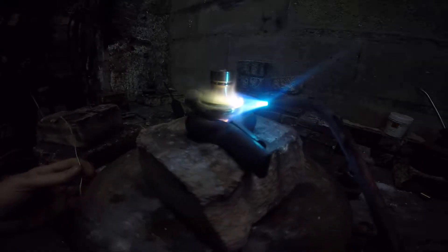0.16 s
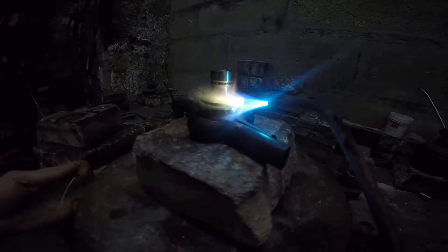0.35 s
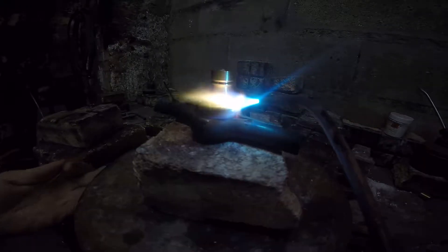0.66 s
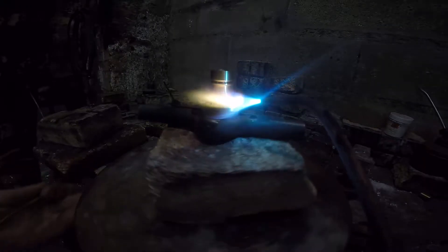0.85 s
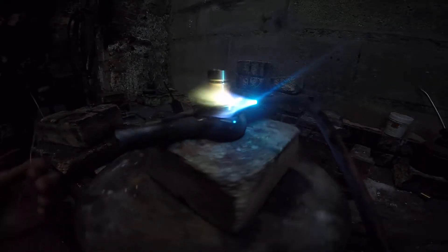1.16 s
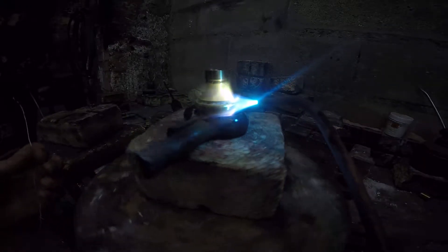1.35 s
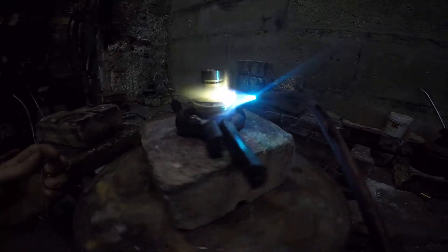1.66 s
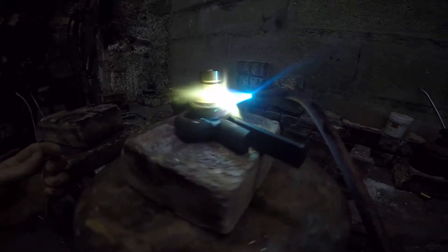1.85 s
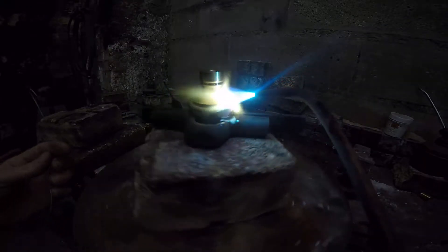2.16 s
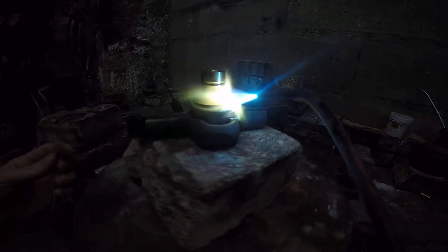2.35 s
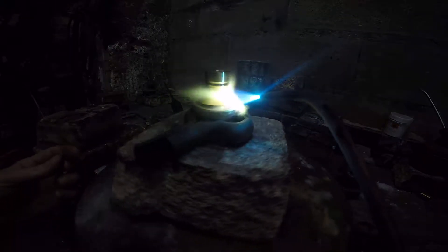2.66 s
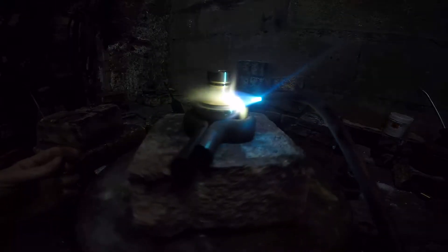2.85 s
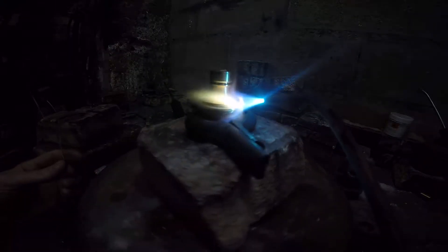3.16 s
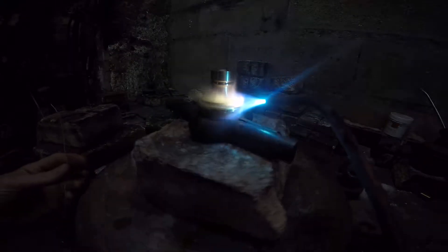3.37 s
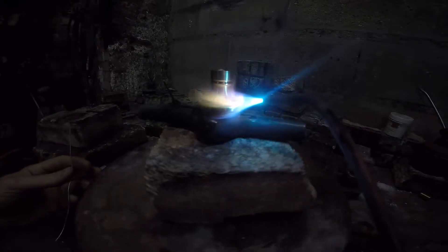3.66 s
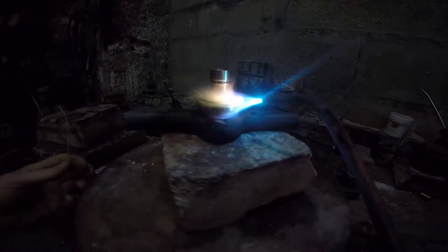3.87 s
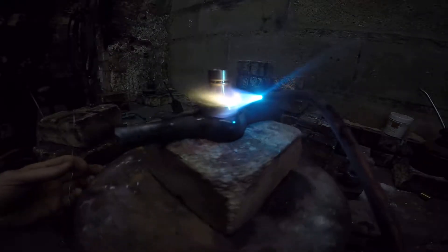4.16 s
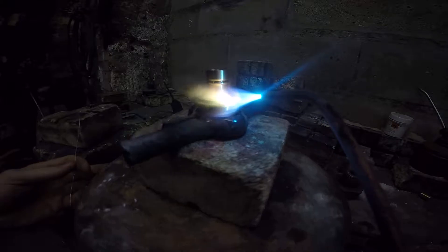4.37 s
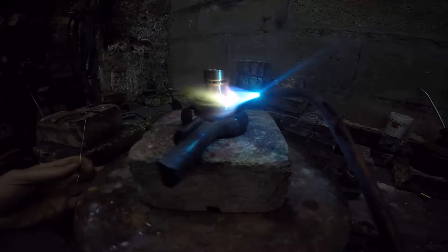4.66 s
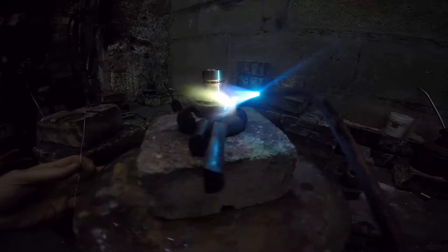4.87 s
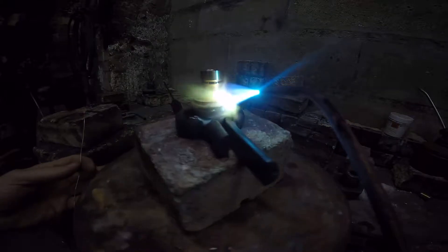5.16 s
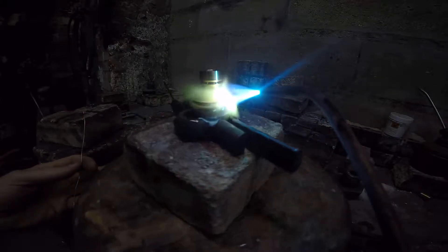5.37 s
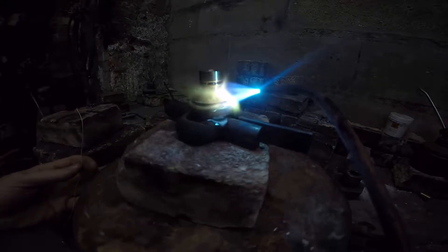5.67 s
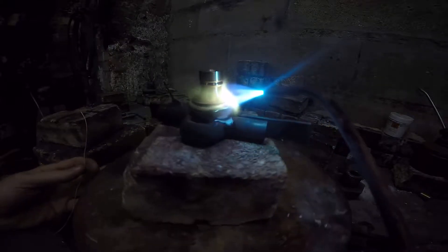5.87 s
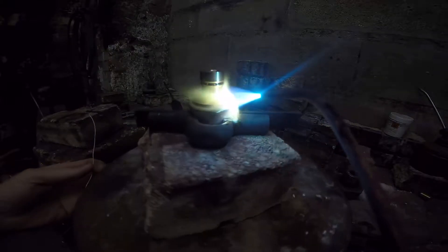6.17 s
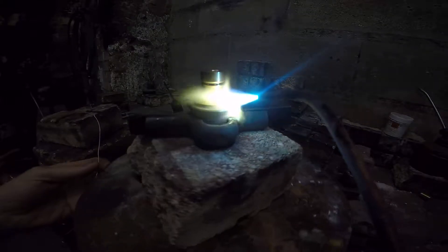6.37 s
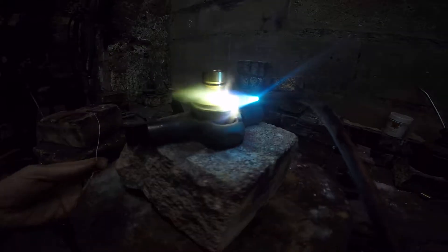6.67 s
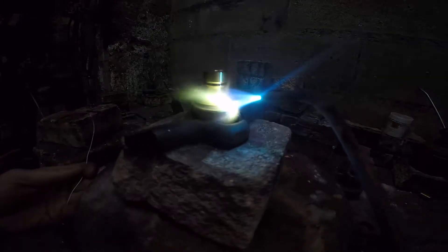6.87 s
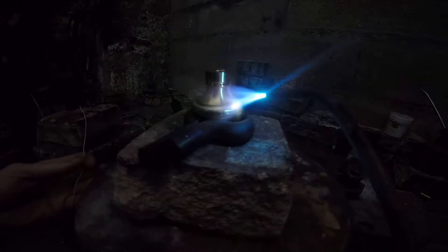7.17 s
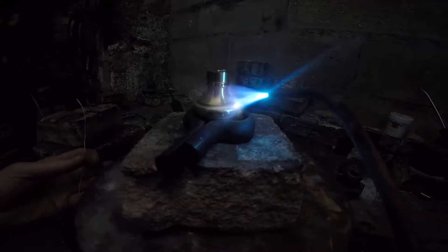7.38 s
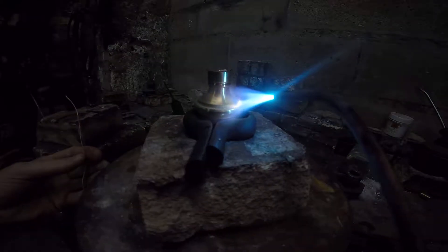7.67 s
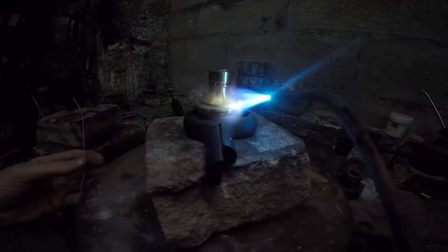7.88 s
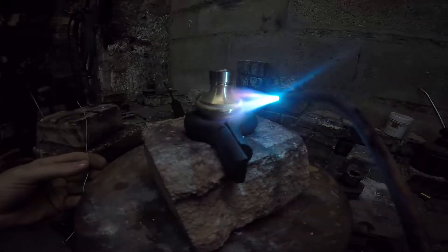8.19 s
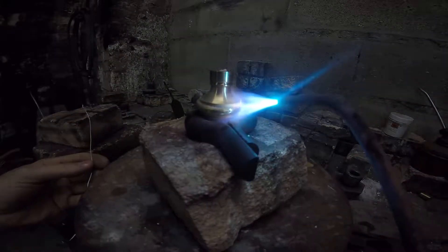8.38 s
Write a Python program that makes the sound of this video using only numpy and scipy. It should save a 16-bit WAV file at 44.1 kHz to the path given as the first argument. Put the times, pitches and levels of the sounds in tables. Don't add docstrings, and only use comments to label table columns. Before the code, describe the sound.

From 0 to 8.5 seconds a gas torch hisses continuously, close and dense, with its energy mainly in the mids and upper mids and a thinner airy top. The jet flutters finely, and its brightness shifts softly every 0.7 to 1 second as faces of the turning metal part splash the flame. At about 0.8 s a heavy, very deep thud rings the small stone room, leaving low rumble that lingers to about 2 s and then subsides unevenly. Between 5 and 6.5 s the flame wraps the part, thickening the low growl slightly. A weaker dull thud comes at 6.8 s; by 7.8 s the torch is drawn back and the tone is fuller in the body, with a little less hiss. Faint motor hum and distant traffic stay underneath. Nearly mono, boxy and notched from the camera housing, with short wall reflections.

```python
import sys
import numpy as np
from scipy import signal
from scipy.fft import rfft, irfft, next_fast_len
from scipy.io import wavfile
from scipy.ndimage import uniform_filter1d, map_coordinates

SR = 44100
rng = np.random.default_rng(int(sys.argv[2]) if len(sys.argv) > 2 else 0)


def master(y):
    cut = np.clip(np.atleast_2d(y).T, -1, 1)
    pcm = np.round(cut * 32767)
    wavfile.write(sys.argv[1], SR, pcm.astype(np.int16))


def nominal_scale(level):
    x = np.asarray(level, float) / 20
    return 10 ** x


N = 376173
STFT_SIZE = 512

# frequency in [Hz], density in [dB per Hz].
JET_DB = [(60, -120), (98, -27), (400, -21), (800, -13.5), (1300, -12.5), (1750, -3.5), (2700, -4),
          (3500, -5), (5000, -6), (7500, -19.5), (9000, -26.5), (10400, -20), (12000, -24.5),
          (15400, -25.5)]
# time in [s], strength in [dB].
FLOW_DB = [(0.0, -24.5), (0.02, -26.5), (0.71, -25), (0.92, -24), (1.21, -26), (1.49, -24.5), (1.83, -27),
           (2.21, -26), (3.26, -26.5), (3.59, -23.5), (4.11, -25.5), (4.44, -25), (5.08, -26.5),
           (6.08, -25), (6.49, -25.5), (8.48, -26.5), (8.53, -25.5)]
# time in [s], drawn back [0-1], flame wraps the part [0-1].
HAND = [
    (0, 0.73, .1),
    (1.2, 0.13, 0),
    (2.2, .05, 0.37),
    (3.9, 0.42, 0.1),
    (5, 0, 0.64),
    (5.9, 0.23, 0.94),
    (6.6, 0.4, 0.67),
    (7.8, 1, 1),
    (8.53, 1, 0.7),
]
# time in [s], half length in [s], level in [dB].
FACES = [(.8, 0.18, 4), (1.552, 0.19, 3.5), (2.12, .13, 3.5), (2.85, 0.36, 3.5), (3.62, 0.17, 4),
         (4.78, 0.2, 2.5), (5.8, .3, 2), (6.549, 0.24, 2.5), (7.6, .2, 2.5)]
# level in [dB], share of flow [dB/dB], share of splash [dB/dB],
# change drawn back in [dB], change wrapped in [dB].
BANDS = [
    (-56.5, .1, -0.18, 0.5, 4.5),
    (-44.5, 0.17, -0.0055, -.3, -1),
    (-41.5, 0.15, 0.017, 5, -.5),
    (-33.5, 0.77, -0.31, -0.8, 1.5),
    (-28, 1.33, -0.063, 0.85, 0.15),
    (-33, .8, 0.36, -.3, 0.35),
    (-39, .3, 1.22, -1.5, -0.45),
    (-45.5, .05, 0.42, 0, -1.2),
    (-43.5, .05, -0.0028, 2.2, 1),
]
SEAMS_HZ = [450, 1350, 2100, 2820, 4250, 6300, 8600, 11800]
# time in [s], centre # in [Hz], half length in [s], level in [dB].
GLINT = [(.1, 12400, .3, 10), (.35, 14130, .5, 6), (.1, 12000, .5, -5), (1.2, 13000, .45, -5),
         (.93, 15160, .17, 5), (1.15, 8700, .35, -3), (1.66, 14500, .13, 10), (2.2, 10500, .5, 2.5),
         (2.17, 15160, .17, 7), (3.3, 12300, .2, 5), (3.35, 14040, .25, 5), (.85, 11900, .3, 4),
         (4.15, 10200, 0.26, -2.5), (7.5, 12150, .35, 2), (3.55, 11000, .3, -2), (4.99, 12000, .5, 2.5),
         (5.06, 12000, .3, 5), (5.55, 13500, .3, 7), (5.5, 14600, .25, 4), (5.91, 9600, 0.2, 5),
         (6.15, 15160, .17, 5), (6.18, 12000, .17, 7), (8.33, 11650, 0.19, 4), (6.6, 12500, .3, -5),
         (7.18, 13950, .5, -5), (7.2, 8700, 0.49, 6), (7.51, 13500, .27, 3), (8.1, 10200, 0.39, -10),
         (8.36, 15500, .17, 6),
         (1.6, 2450, .12, -1.5), (2.2, 1700, .1, -2.5), (2.3, 4200, 0.16, -2.5), (3.248, 1750, .15, 4.5),
         (3.42, 2600, .12, -2.5), (4.596, 2400, 0.098, -1), (4.6, 5400, .2, -2), (5.2, 1750, .12, 2),
         (5.3, 5100, .3, 2), (6.15, 4200, .2, -3), (6.7, 2450, .35, 1)]
GLINT_WIDTH_HZ = 460
# time in [s], half length in [s], level in [dB].
SHADE = [(0.312, .3, -1), (1, .12, -2), (1.86, .06, -3), (2.3, .08, -2), (2.72, .15, 2.5), (3.83, .12, -4),
         (5.2, .1, -4), (6.22, .1, -4), (6.68, .15, 2.5), (7.98, 0.18, -3)]
SHADE_HZ, SHADE_WIDTH_HZ = 13500, 1400
# frequency in [Hz], share [0-1].
SCATTER = [(300, 0.018), (2000, 0.047), (6000, 0.09), (10000, 0.62), (15000, 0.34)]
# delay in [s], drift in [knots per s].
ECHO_PATHS = [(.0007, 0.487), (.0013, 0.69), (.0022, 1.1), (.0036, 1.8)]
# frequency in [Hz], depth in [dB].
PATCHY_DB = [(4000, .1), (8000, .8), (13000, 2)]
# frequency in [Hz], depth in [dB].
FLUTTER_DB = [(1000, 1), (3500, .5), (6000, 0.9), (9000, 0.9), (14000, 1)]
# centre in [Hz], width in [Hz], gain in [dB].
HOUSING = [(231, 20, -6), (517, 175, -5), (763, 38, -5), (800, 52, 2), (978, 80, -8), (1008, 8, 6),
           (1167, 12, -5), (1325, 625, -16), (1565, 38, -7), (2060, 625, -14.5), (2370, 115, -10.5),
           (2728, 85, 10.5), (2820, 250, -13), (3130, 174, -8), (3345, 160, 7), (3850, 50, 2.5),
           (3520, 30, -3), (3870, 300, 8.5), (4250, 807, -20.5), (5200, 121, -5.5), (5310, 202, -5.5),
           (5580, 243, 4), (6270, 625, -7.5), (6430, 162, 9.5), (6670, 347, -8.5), (7210, 59, -5.5),
           (7620, 384, 9), (9540, 587, -12), (10900, 610, -8.5), (13100, 200, 3)]
# start in [s], level in [dB], hold in [s].
ROOM = [
    [(-.1, -44, 0.91), (.77, -30.5, 0.46), (1.55, -37.5, 0.31), (2.05, -42.5, .3), (3.2, -42.5, 0.75),
     (4.5, -45.5, 0.9), (5.72, -46.5, 0.43), (6.58, -47.5, 1.1)],
    [(-.1, -51, .7), (.9, -43, 0.58), (2.65, -42, 0.93), (4.2, -48, .3), (4.72, -40, 0.3),
     (5.55, -47.5, .45), (6.8, -42, .08), (7.0, -45.5, 0.46), (7.75, -49, .5)],
    [(.77, -37, .1), (1.1, -39, .1), (1.55, -38.5, 0.089), (1.95, -46, .3), (2.8, -42.5, .35),
     (3.3, -51, .3), (6.8, -45, .06), (7.8, -50, .25)],
    [(.77, -36, 0.09), (1.27, -39, 0.11), (1.75, -45, 0.35), (2.6, -48, .55), (3.4, -52, 0.8)],
]
ROOM_HZ = [37.5, 45.6, 60, 69.7]
FALL_DB_PER_S = [35, 55, 60, 65]
RISE_S, QUIET_DB = 0.048, -59
# time in [s], peak in [dB], frequency in [Hz], t60 in [s].
THUDS = [
    (0.77, -8.5, 60, 0.14),
    (6.804, -22, 50, 0.19),
]
# frequency in [Hz], level in [dB rms].
HUM = [(92, -55.5), (73.8, -60.5), (111, -79)]
# frequency in [Hz], density in [dB per Hz].
TRAFFIC_DB = [(8, -120), (16, -17), (28, -1), (40, -2), (70, 2), (92, -2), (102, -16), (150, -120)]
# time in [s], centre in [Hz], width in [Hz], level in [dB].
STRAYS = [(1.8, 14500, 1700, -60), (2.36, 4700, 1200, -41), (2.36, 11100, 1600, -51),
          (4.75, 4800, 1200, -40), (4.75, 8200, 1700, -48), (4.75, 13900, 1700, -56),
          (6.285, 5900, 1500, -37), (6.285, 8900, 3000, -48)]
TOP_HZ = 15310


def torch():
    jet = walls(filtered(rng.standard_normal(N), housing), t60_s=.14, db=-24)
    hz, t, z = signal.stft(jet, SR, nperseg=STFT_SIZE, noverlap=STFT_SIZE * 3 // 4)
    moving = echoes(hz, t)
    band = np.searchsorted(SEAMS_HZ, hz)
    shape = housing(hz)[:, None] * moving
    power = np.array([np.sum(shape[band == k] ** 2, axis=0) for k in range(len(SEAMS_HZ) + 1)])
    band_gain = nominal_scale(band_db(t)) * np.sqrt(len(hz) / power)
    gain = uniform_filter1d(band_gain[band], size=3, axis=0)
    gain = gain * nominal_scale(glints_db(hz, t)) * flicker(hz, t)
    return signal.istft(z * moving * gain, SR, nperseg=STFT_SIZE, noverlap=STFT_SIZE * 3 // 4)[1][:N]


def band_db(t):
    flow_db, = curves(FLOW_DB, t)
    back, wrap = curves(HAND, t)
    splash_db = sum(db * bump(t, s, half_s) for s, half_s, db in FACES)
    return np.array(BANDS) @ [np.ones_like(t), flow_db - flow_db.mean(), splash_db, back, wrap]


def glints_db(hz, t):
    db_map = np.outer(bump(hz, SHADE_HZ, SHADE_WIDTH_HZ), sum(db * bump(t, s, half_s) for s, half_s, db in SHADE))
    for s, centre_hz, half_s, db in GLINT:
        db_map += db * np.outer(bump(hz, centre_hz, GLINT_WIDTH_HZ), bump(t, s, half_s))
    return db_map


def flicker(hz, t):
    chance = rng.standard_normal((24, 600))
    patches = map_coordinates(chance[:, 500:], np.meshgrid(hz / 1000, t * 7, indexing="ij"))
    eddies = map_coordinates(chance, np.meshgrid(hz / 1200, t * 55, indexing="ij"))
    flutter = 0.26 * wobble(45, t) + 0.27 * wobble(115, t) + 0.52 * eddies
    return nominal_scale(along(PATCHY_DB, hz)[:, None] * patches + along(FLUTTER_DB, hz)[:, None] * flutter)


def echoes(hz, t):
    turns = [np.outer(hz, delay_s + .00012 * wobble(rate, t)) for delay_s, rate in ECHO_PATHS]
    comb = sum(np.exp(-2j * np.pi * u) for u in turns) / 2
    return np.abs(1 + along(SCATTER, hz)[:, None] * comb)


def housing(hz):
    gain = 1
    for centre_hz, width_hz, db in HOUSING:
        off, damp = centre_hz ** 2 - hz ** 2, 1j * hz * width_hz
        gain = gain * np.abs((off + damp * nominal_scale(db)) / (off + damp))
    leak = np.interp(hz, [4500, 6000], [.08, .35])
    return nominal_scale(along(JET_DB, hz)) * np.hypot(gain, leak)


def walls(x, t60_s, db):
    t = np.arange(SR // 4) / SR
    tail = rng.standard_normal(len(t)) * nominal_scale(-60 * t / t60_s) * (t > .004)
    tail = np.convolve(tail, np.hanning(17))
    answer = signal.fftconvolve(x, tail / np.linalg.norm(tail))[:N]
    return (x + nominal_scale(db) * answer) / np.sqrt(1 + nominal_scale(db))


def sputter(x, db, edge_hz):
    t = np.arange(N) / SR
    knots = rng.exponential(size=8000) - 1
    bursts = np.interp(t * 500, np.arange(len(knots)), knots)
    treble = filtered(x, lambda hz: 1 / (1 + (edge_hz / (hz + 1)) ** 4))
    gain = nominal_scale(db * bursts)
    return x + treble * (gain / np.sqrt(np.mean(gain ** 2)) - 1)


def rumble():
    t = np.arange(N) / SR
    levels_db = [swells(rows, fall, t) for rows, fall in zip(ROOM, FALL_DB_PER_S)]
    low = np.zeros(N)
    for hz, db in zip(ROOM_HZ, levels_db):
        low += nominal_scale(db + 1.2 * wobble(5, t)) * tone(hz, .91, t)
    for hz, db in HUM:
        low += nominal_scale(db + 1.5 * wobble(4.5, t)) * tone(hz, .38, t)
    low += nominal_scale(levels_db[3] - 23) * tone(116.5, .4, t)
    wash = filtered(rng.standard_normal(N), lambda hz: nominal_scale(along(TRAFFIC_DB, hz)))
    loudness = np.sqrt(np.sum(nominal_scale(levels_db) ** 2, axis=0))
    low += wash / wash.std() * (nominal_scale(-16) * loudness + nominal_scale(-65))
    for s, db, hz, t60_s in THUDS:
        u = np.clip(t - s, 0, None)
        onset = 1 - np.exp(-(u / 0.017) ** 2)
        low -= nominal_scale(db - 60 * u / t60_s) * onset * np.sin(2 * np.pi * hz * u)
    return low


def swells(rows, fall_db_per_s, t):
    step = t[::STFT_SIZE // 2]
    power = nominal_scale(2 * QUIET_DB)
    for s, db, hold_s in rows:
        u = np.clip(step - s, 0, None)
        fall_db = fall_db_per_s * np.clip(u - hold_s, 0, None)
        power = power + (nominal_scale(db - fall_db) * (1 - bump(u, 0, RISE_S))) ** 2
    return np.interp(t, step, 10 * np.log10(power))


def tone(hz, drift_rad, t):
    return np.sqrt(2) * np.sin(2 * np.pi * hz * t + drift_rad * wobble(2.7, t))


def strays():
    out, t = np.zeros(N), np.arange(2 * STFT_SIZE)
    for s, hz, width_hz, db in STRAYS:
        edges_hz = np.clip([hz - width_hz / 2, hz + width_hz / 2], 100, SR / 2 - 100)
        band = signal.butter(10, edges_hz, "band", fs=SR, output="sos")
        puff = signal.sosfilt(band, rng.standard_normal(len(t)))
        out[round(s * SR) - STFT_SIZE:][:len(t)] += nominal_scale(db + 3) * np.hanning(len(t)) * puff / puff.std()
    return out


def filtered(x, response):
    m = next_fast_len(N + 8192)
    return irfft(rfft(x, m) * response(np.fft.rfftfreq(m, 1 / SR)), m)[..., :N]


def along(points, hz):
    f, v = np.transpose(points)
    return np.interp(np.log(hz + 1), np.log(f + 1), v)


def curves(rows, t):
    s, *cols = np.transpose(rows)
    return [np.interp(t, s, c) for c in cols]


def wobble(rate, t):
    return map_coordinates(rng.standard_normal(999), [t * rate], mode="wrap")


def bump(x, centre, half):
    return np.exp(-((x - centre) / half) ** 2)


def scene():
    return np.tile(sputter(torch(), db=1.16, edge_hz=4300) + rumble(), (2, 1))


def top_cut(x):
    return signal.sosfilt(signal.butter(12, 15660, fs=SR, output="sos"), x)


def record(dry):
    mix = filtered(dry + strays() * [[1], [-1]], lambda hz: hz < TOP_HZ)
    return top_cut(mix)


dry = scene()
out = record(dry)
master(out)
```